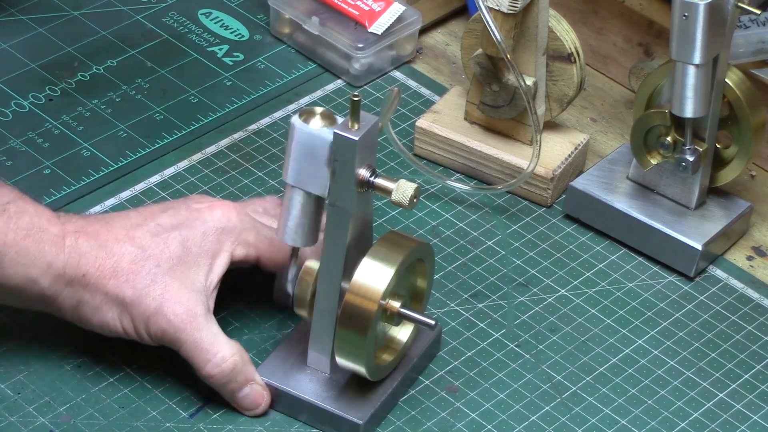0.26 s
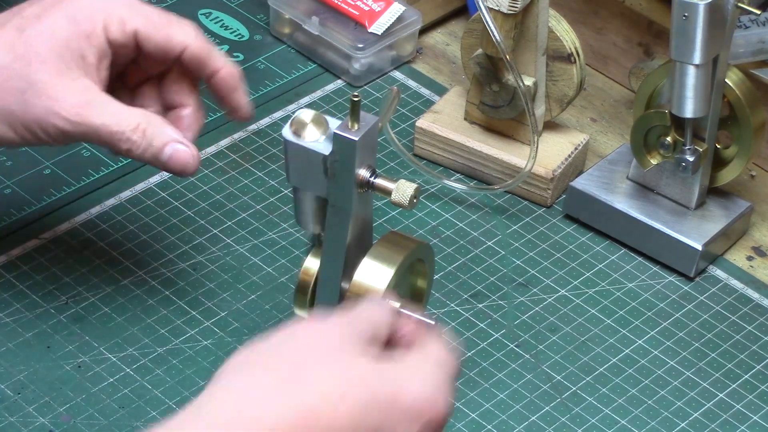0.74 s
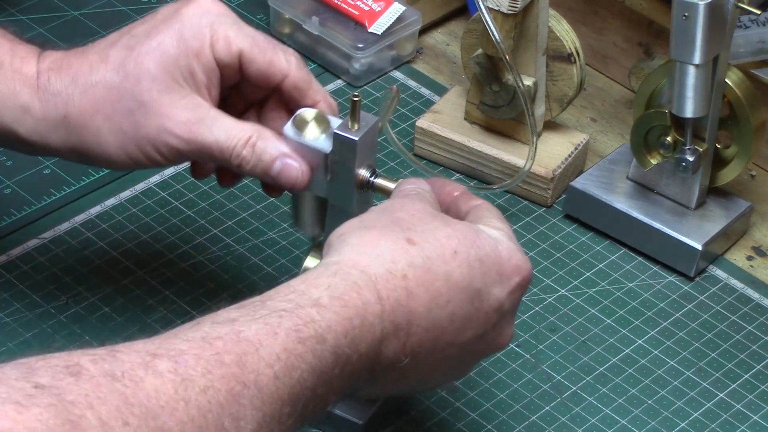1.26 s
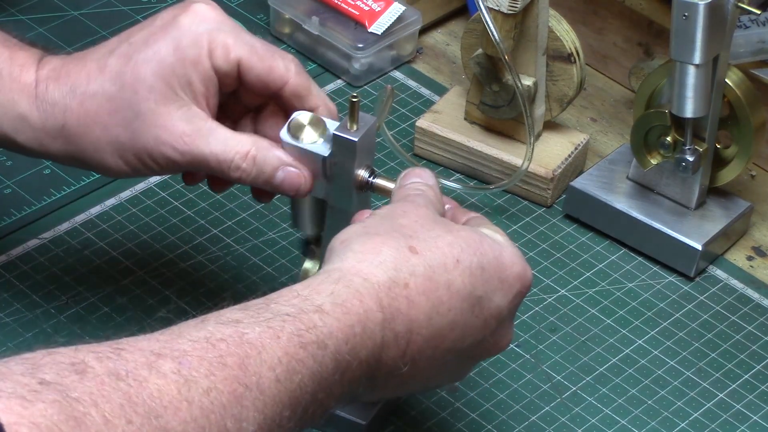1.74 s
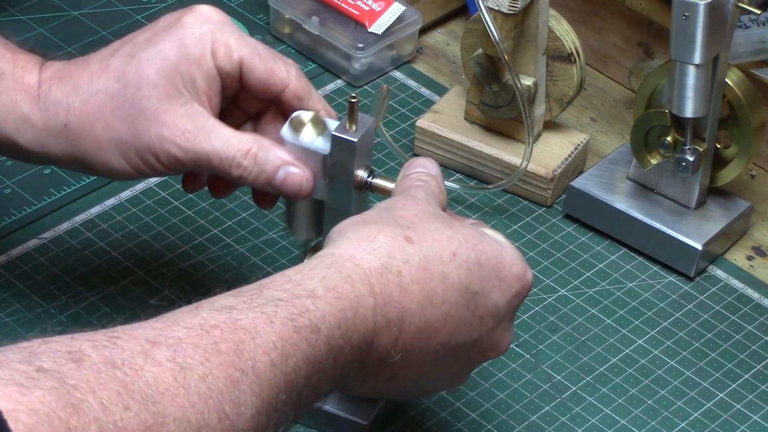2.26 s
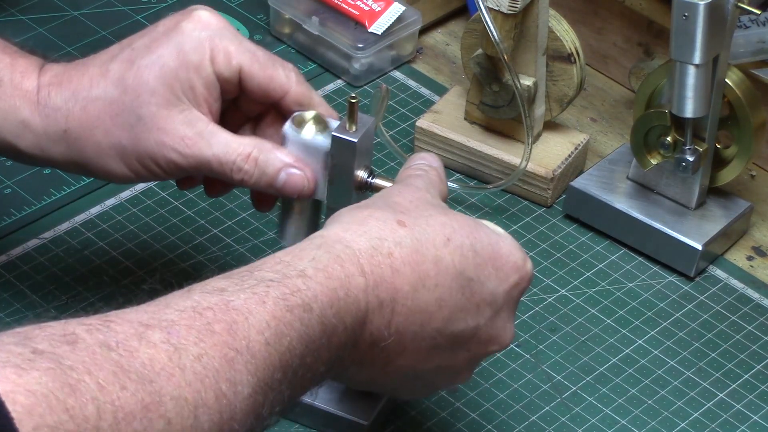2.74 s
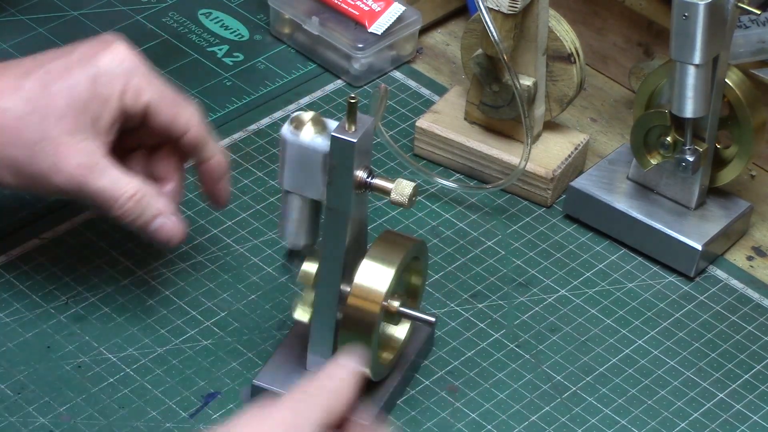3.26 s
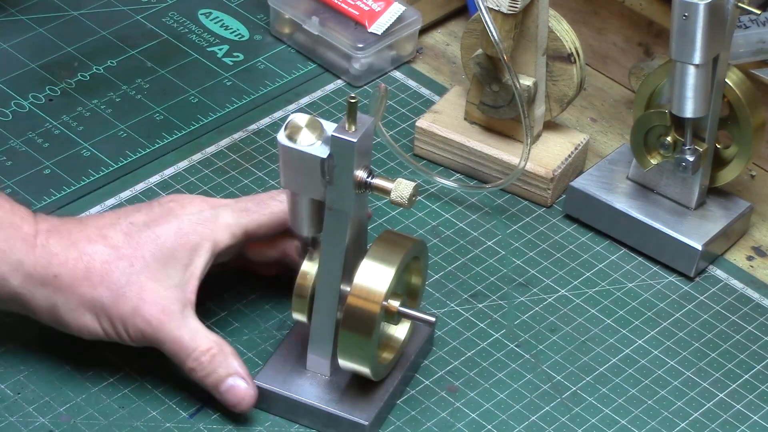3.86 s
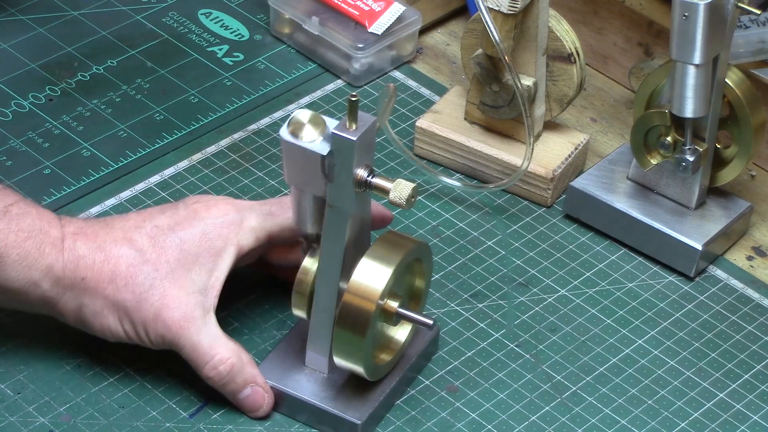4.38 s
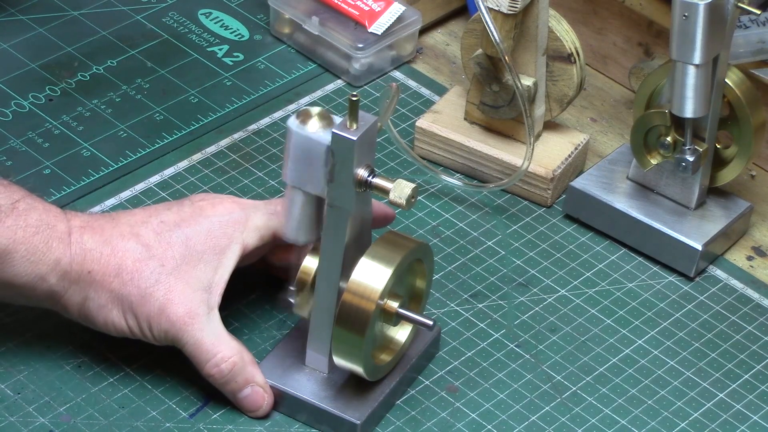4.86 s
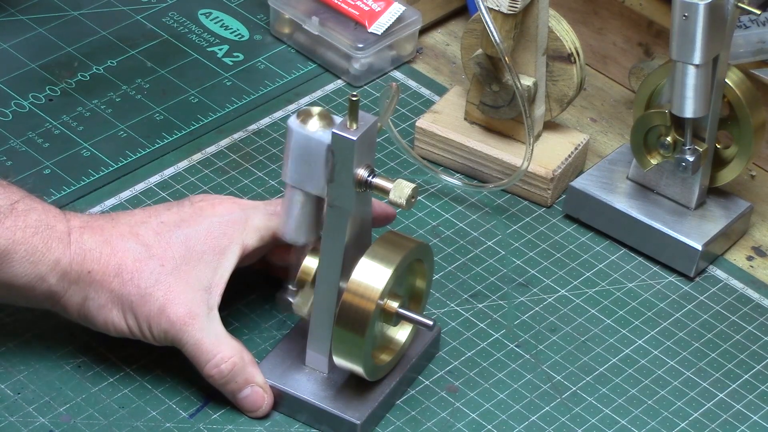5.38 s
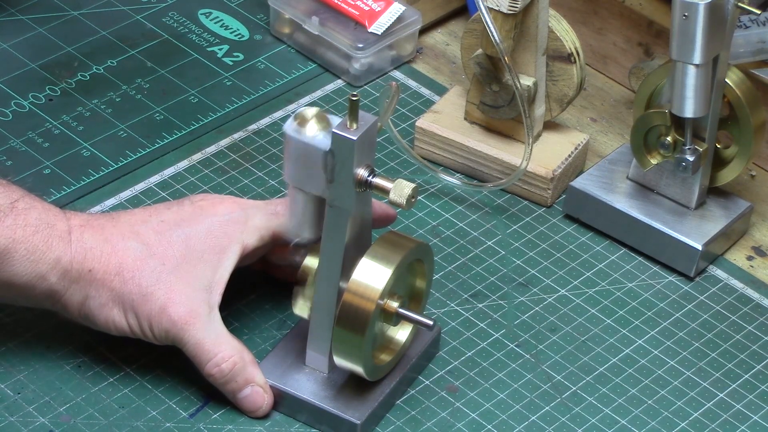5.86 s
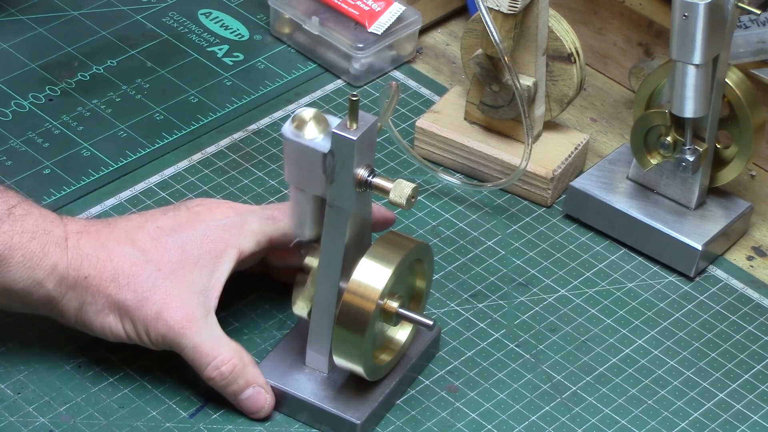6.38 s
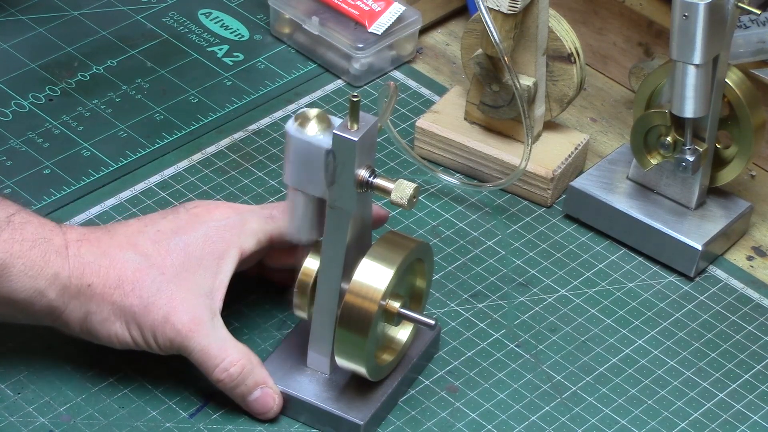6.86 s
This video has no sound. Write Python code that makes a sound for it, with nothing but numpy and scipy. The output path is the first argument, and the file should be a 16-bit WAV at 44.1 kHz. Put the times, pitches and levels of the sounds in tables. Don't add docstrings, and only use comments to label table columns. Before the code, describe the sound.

A small metal engine driven by compressed air runs throughout, close to the microphone in a small workshop with short reflections and a faint low airy hum. Each turn gives a bright, sizzling exhaust puff that swells in about nine milliseconds and fades quickly, roughly ten per second, uneven in strength and slightly whistly. Between puffs come a small metallic tick and a dull low knock. A very faint slide opens, and a short scuff comes at 0.9 seconds. From about 1.1 to 3 seconds hands hold it: puffs grow a little stronger, the pace eases slightly to about nine per second, and the cylinder clacks. A hard low thud with quick bounces lands at 1.75, a softer one at 1.86, with faint taps around 1.2, 2.1 and 2.96. After 3 seconds it returns to steady free chuffing, with light rattly knocks, and is still running at about 7 seconds.

```python
import sys
import numpy as np
from scipy import signal
from scipy.fft import rfft, irfft, next_fast_len
from scipy.io import wavfile

SR = 44100
rng = np.random.default_rng(int(sys.argv[2]) if len(sys.argv) > 2 else 0)


def file_out(sig):
    cols = np.atleast_2d(sig).T
    lim = np.clip(cols, -1, 1)
    pcm = np.round(lim * 32767).astype(np.int16)
    wavfile.write(sys.argv[1], SR, pcm)


def undo_db(level):
    steps = np.asarray(level, float) / 20
    return 10 ** steps


N = 313987


def at_hz(points, hz):
    table_hz, values = np.transpose(points)
    return np.interp(np.log(hz + 1), np.log(table_hz), values)


def rms_one(x):
    return x / np.sqrt(np.mean(x ** 2) + 1e-20)


def shaped(x, response):
    length = x.shape[-1]
    size = 2 * next_fast_len(length // 2 + SR // 8)
    hz = np.arange(size // 2 + 1) * SR / size
    return irfft(rfft(x, size) * response(hz), size)[..., :length]


def flutter(rate_hz):
    return rms_one(shaped(rng.standard_normal(N), lambda hz: 1 / (1 + (hz / rate_hz) ** 2)))


def struck(times_s, levels_db, modes, soft_hz, scatter_db):
    out = np.zeros(N)
    at = (np.asarray(times_s) * SR).astype(int)
    luck = rng.standard_normal((len(at), len(modes)))
    for k, (hz, level_db, t60_s) in enumerate(modes):
        clicks = np.full(N, 1e-18)
        clicks[at] = undo_db(np.asarray(levels_db) + level_db + scatter_db * luck[:, k])
        radius, angle = undo_db(-60 / (t60_s * SR)), 2 * np.pi * hz / SR
        out += signal.lfilter([0, np.sin(angle)], [1, -2 * radius * np.cos(angle), radius ** 2], clicks)
    return signal.sosfilt(signal.butter(2, soft_hz, fs=SR, output="sos"), out)


# hz, level_db (per Hz)
SHOP_AIR = [(25, -20), (50, -18), (100, -4), (200, -6.5), (300, -3), (500, -3), (800, -7.5), (960, -3),
            (1300, -17.5), (4000, -18), (11000, -23), (17000, -44)]


def shop_air():
    air = shaped(rng.standard_normal((2, N)), lambda hz: undo_db(at_hz(SHOP_AIR, hz)))
    return undo_db(-60.5) * rms_one(air) * undo_db([[0], [-10.5]])


# time_s, share (0-1)
GRIP = [
    (0, 0),
    (.95, 0),
    (1.1, 1),
    (2.92, 1),
    (3.05, 0),
    (7.2, 0),
]


def held(s):
    return np.interp(s, *np.transpose(GRIP))


# time_s, turns_done
CRANK_TURNS = [(-.031, 0), (.2826, 3), (.5987, 6), (1.2355, 12), (1.3431, 13), (1.4537, 14), (1.5673, 15),
               (1.7981, 17), (2.0213, 19), (2.2396, 21), (2.5632, 24), (2.9877, 28), (3.1964, 30),
               (3.8186, 36), (5.0655, 48), (6.2172, 59), (6.5343, 62), (7.0601, 67)]


def turn_times(share):
    s, turns = np.transpose(CRANK_TURNS)
    opens = np.interp(np.arange(turns[-1] + 1), turns, s)
    return opens + share * np.gradient(opens)


# time_s, swing_db
UNEVEN_STROKES = [(.28, -1.5), (.6, 0), (.71, -2.5), (.81, -3), (.92, 1), (1.02, -5.5), (1.13, -0.5),
                  (1.45, -3.3), (2.02, -3.5), (2.35, -1.5), (2.78, -3.5), (2.88, 2), (3.3, -1.5),
                  (3.82, -4), (3.92, -1.5), (4.13, -3), (4.23, -2.5), (4.55, 1), (4.65, -1.5), (4.75, -2),
                  (4.86, -2.5), (4.96, -3.5), (5.07, 0), (5.17, -3.5), (5.27, -2.5), (5.48, 2),
                  (5.59, -1.5), (5.8, -3.5), (5.9, -2.5), (6.74, -1.5)]


def strokes():
    opens = turn_times(0)
    grip = held(opens)
    luck = rng.standard_normal((len(opens), 5))
    swing_db = 0.4 * luck[:, 0]
    for s, db in UNEVEN_STROKES:
        swing_db[np.argmin(abs(opens - s))] = db
    rise_ms = 8.95 + 1.0 * np.tanh(luck[:, 1])
    jet_db = -10 + 1.92 * grip + swing_db

    def share_db(k, usual_db, lazy, scatter_db, held_db):
        return usual_db - lazy * swing_db + scatter_db * luck[:, 2 + k] + held_db * grip

    pipe_db = share_db(0, usual_db=-1, lazy=0.52, scatter_db=0.5, held_db=0.04)
    cylinder_db = share_db(1, usual_db=-0.5, lazy=0.73, scatter_db=0.32, held_db=-2.5)
    push_db = share_db(2, usual_db=-13, lazy=0.67, scatter_db=-0.66, held_db=-0.6)
    return opens, rise_ms, jet_db, pipe_db, cylinder_db, push_db


# hz, level_db (per Hz)
JET_COLOUR = [(400, -33.5), (800, -27.5), (1300, -27), (1810, -15), (2490, -19), (2900, -12.5),
              (3960, -19.5), (5290, -18.5), (6630, -6), (8300, -11.5), (10800, -2), (12000, -7),
              (14000, -6.5), (15700, -12.5)]
# hz, width_hz, level_db
PORT_MODES = [(1120, 130, -35), (1800, 300, -25), (2280, 110, -19), (2900, 600, -17), (3660, 90, -25),
              (4930, 80, -25), (5760, 50, -25), (6420, 90, -12), (6600, 60, -12), (6850, 280, -10),
              (7800, 250, -13), (8330, 80, -19), (9200, 200, -14), (9620, 120, -12), (10250, 260, -11),
              (10650, 110, -4), (10950, 300, 1), (11400, 120, -8), (11980, 60, -13), (12310, 90, -10),
              (12900, 220, -11), (13800, 160, -13), (14520, 170, -14), (15100, 160, -17), (15600, 150, -18)]


def nozzle(hz, broad_db, peaks_db):
    power = undo_db(2 * (at_hz(JET_COLOUR, hz) + broad_db))
    for (top_hz, width_hz, level_db), lift_db in zip(PORT_MODES, peaks_db):
        power = power + undo_db(2 * (level_db + lift_db)) / (1 + (2 * (hz - top_hz) / width_hz) ** 2) ** 2
    cepstrum = irfft(.5 * np.log(power))
    half = len(cepstrum) // 2
    cepstrum[1:half] *= 2
    cepstrum[half + 1:] = 0
    return np.exp(rfft(cepstrum))


def seated(flow, lean, broad_db, peaks_db):
    favour_db = 3.0 * (-1) ** np.arange(len(PORT_MODES))
    one = shaped(flow * lean, lambda hz: nozzle(hz, broad_db, peaks_db + favour_db))
    other = shaped(flow * (1 - lean), lambda hz: nozzle(hz, broad_db, peaks_db - favour_db))
    return one + other


BORDERS = (4400, 8200, 12300)
BLAST_FALL = (11.4, 2.53, 5.6, 2.4)
PEAK_LAG = (1.2, 1.11, 0.96, 1.12)
PUSH_LEVEL = (6.55, 10, 6.6, 5.1)


def exhaust(crack_db, close_ms, close_db, push_fall_ms, sputter_db, shade_db):
    air = rng.standard_normal(N) * undo_db(sputter_db * np.tanh(flutter(290)))
    opens, rise_ms, jet_db, pipe_db, cylinder_db, push_db = strokes()
    s = np.arange(N) / SR
    turn = np.clip(np.searchsorted(opens, s) - 1, 0, None)
    ms = np.maximum(s - opens[turn], 0) * 1000
    shut = undo_db(close_db * np.clip((ms - close_ms) / 3.1, 0, 1))
    crack = undo_db(crack_db - 5.7 * held(opens)[turn]) * np.minimum(ms / 2, 1)
    above = [lambda hz, edge=edge: 1 / (1 + (edge / (hz + 1)) ** 16) for edge in BORDERS]
    zones = [lambda hz: 1 - above[0](hz),
             lambda hz: above[0](hz) - above[1](hz),
             lambda hz: above[1](hz) - above[2](hz),
             above[2]]
    shares_db = [cylinder_db, pipe_db, 0 * jet_db, shade_db * held(opens)]
    blast_out = push_out = 0
    for zone, share_db, fall_ms, lag, zone_push_db in zip(zones, shares_db, BLAST_FALL, PEAK_LAG, PUSH_LEVEL):
        peak_ms = rise_ms[turn] * lag
        swell = crack + np.minimum(ms / peak_ms, 1) ** 1.4
        after_ms = np.maximum(ms - peak_ms, 0)
        flow = air * swell * shut * undo_db((jet_db + share_db)[turn])
        blast = np.exp(-after_ms / fall_ms)
        push = undo_db(push_db[turn] + zone_push_db) * np.exp(-after_ms / push_fall_ms)
        blast_out = blast_out + shaped(flow * blast, zone)
        push_out = push_out + shaped(flow * push, zone)
    lean = rng.random(len(opens))[turn]
    blast_out = seated(blast_out, lean, broad_db=-2.5, peaks_db=5.5)
    return blast_out + seated(push_out, lean, broad_db=-3.0, peaks_db=2.0)


# time_s, level_db
BENCH_SHAKE = [(0, -47.5), (.3, -47.5), (.65, -53.5), (.9, -53), (1.05, -48.5), (1.2, -54), (1.7, -48.5),
               (2.1, -51), (2.4, -56), (2.7, -69), (2.94, -63), (3.04, -51), (3.3, -52.5), (4.35, -54.5),
               (4.7, -50.5), (5.6, -49), (6.3, -50.5), (7.1, -48.5)]


def shake(s):
    return np.interp(s, *np.transpose(BENCH_SHAKE))


# hz, level_db, t60_s
BASE_MODES = [(183.8, -1, 0.064), (139, -4.5, 0.11), (93, -24, 0.11), (302, -6.5, 0.034)]
# hz, level_db, t60_s
FRAME_MODES = [(500, 0, .025), (1080, -14, .03)]
# hz, level_db, t60_s
ROD_MODES = [(2290, -3, .07), (750, -9, .025), (1330, -6, .015), (2040, -5, .02)]
# offset_ms, level_db
PLAY = [
    (-24, -9),
    (-9, -10),
    (.8, 0),
    (20, -10),
]


def crank(grip_db):
    s = turn_times(.474 - 0.021 * held(turn_times(0)))
    luck = rng.standard_normal((len(s), 2))
    frame_db = shake(s) + 0.84 * luck[:, 0]
    follow_db = .3 * (shake(s) - np.median(frame_db))
    base_db = -58.5 + follow_db - 1.5 * held(s) + luck[:, 1]
    knock = struck(s - .003, -48 + 0 * s, ROD_MODES[:1] + ROD_MODES[2:], 3500, scatter_db=4)
    knock += struck(s + 0.004, -56 + grip_db * held(s), ROD_MODES[1:2], 1270, scatter_db=3)
    for offset_ms, level_db in PLAY:
        at = np.clip(s + offset_ms / 1000, 0, N / SR - .003)
        knock += struck(at, frame_db + level_db + 8.0, FRAME_MODES, 1120, scatter_db=0.05)
        thump_db = np.minimum(base_db, -54) + level_db + 7.5
        knock -= struck(at + .002, thump_db, BASE_MODES[:1], 500, scatter_db=1.2)
    return knock


# start_s, length_s
SLIDES = [
    (.02, .25),
    (.857, .062),
    (1.49, .04),
]
SLIDE_LEVEL = (-58.5, -48, -57)


def scuffs():
    s, stroke = np.arange(N) / SR, 0
    for (start_s, length_s), level_db in zip(SLIDES, SLIDE_LEVEL):
        part = np.clip((s - start_s) / length_s, 0, 1)
        stroke = stroke + undo_db(level_db) * np.sqrt(part * (1 - part)) * 2
    slips = rng.standard_normal(N) * undo_db(4 * flutter(150))

    def dull(hz):
        return 1 / (1 + ((hz - 550) / 220) ** 2) + 0.59 / (1 + ((hz - 1400) / 150) ** 2)

    return stroke * rms_one(shaped(slips, dull))


def rumble():
    usual_db = np.median(np.array(BENCH_SHAKE)[:, 1])
    level_db = -68.5 + 0.48 * (shake(np.arange(N) / SR) - usual_db)
    band = signal.butter(2, [60, 125], "band", fs=SR, output="sos")
    return undo_db(level_db) * rms_one(signal.sosfilt(band, rng.standard_normal(N)))


THUD_TIMES = [
    1.2,
    1.7465,
    1.764,
    1.782,
    1.86,
    1.877,
    1.897,
    2.12,
    2.96,
]
THUD_LEVEL = (-60, -33.5, -46, -43.5, -38, -54, -49, -57, -56)


def thuds():
    return struck(THUD_TIMES, THUD_LEVEL, BASE_MODES, 600, scatter_db=1.5)


# hz, t60_s
ROOM_DECAY = [(300, 0.18), (2000, 0.16), (7000, 0.12), (11000, 0.072), (16000, 0.11)]


def room(x, first_ms):
    t = np.arange(int(.3 * SR)) / SR
    noise = rng.standard_normal((2, len(t)))
    edges_hz, tail = 60 * 2 ** np.arange(0, 8.6, .5), 0
    for low_hz, high_hz in zip(edges_hz, np.minimum(edges_hz[1:], .45 * SR)):
        sos = signal.butter(2, [low_hz, high_hz], "band", fs=SR, output="sos")
        t60_s = at_hz(ROOM_DECAY, np.sqrt(low_hz * high_hz))
        tail = tail + signal.sosfilt(sos, noise) * undo_db(-60 * t / t60_s)
    tail = tail * np.clip(t * 1000 / first_ms - 1, 0, 1)
    tail = tail / np.sqrt(np.sum(tail ** 2, axis=1, keepdims=True))
    return signal.fftconvolve(x[None], tail, axes=1)[:, :N]


def scene():
    room_db, side_db, left_db, lag_s = -8.5, -16.5, .3, 3 / 1.9e6
    air = shop_air()
    jet = exhaust(crack_db=-26.5, close_ms=40, close_db=-5.5, push_fall_ms=22.15, sputter_db=0.0, shade_db=-2.0)
    knocks = crank(grip_db=14) + scuffs() + rumble() - thuds()
    engine = jet + knocks
    wet = room(jet + .5 * knocks, first_ms=2.44)
    mid = engine + undo_db(room_db) * wet[0] + air[0]
    slant = np.gradient(engine) * SR * lag_s
    side = undo_db(room_db + side_db) * wet[1] + air[1] + slant
    return np.array([(mid + side) * undo_db(left_db / 2), (mid - side) * undo_db(-left_db / 2)])


def roll_off(x):
    return signal.sosfilt(signal.butter(12, 16800, fs=SR, output="sos"), x)


def record(dry):
    thin = signal.sosfilt(signal.butter(3, 70, "high", fs=SR, output="sos"), dry)
    rounded = .8 * np.tanh(thin / .8)
    cut = signal.sosfilt(signal.cheby2(12, 28, 15950, fs=SR, output="sos"), rounded)
    return roll_off(cut)


dry = scene()
out = record(dry)
file_out(out)
```